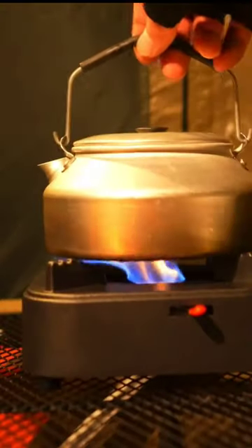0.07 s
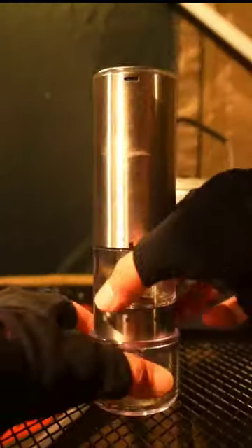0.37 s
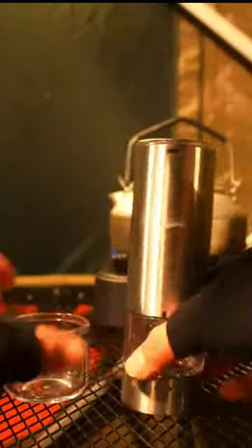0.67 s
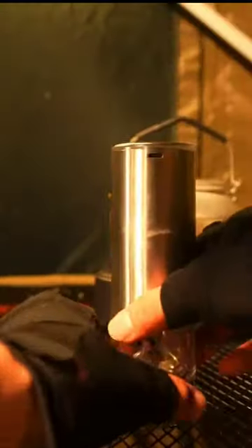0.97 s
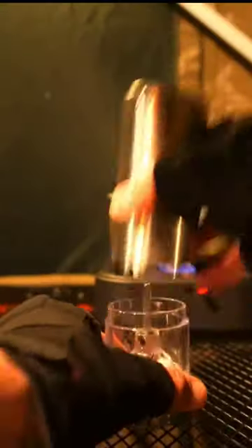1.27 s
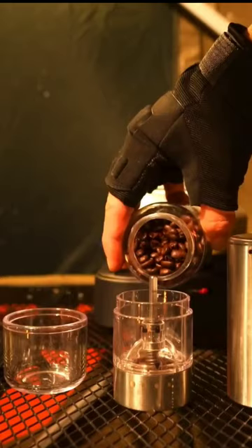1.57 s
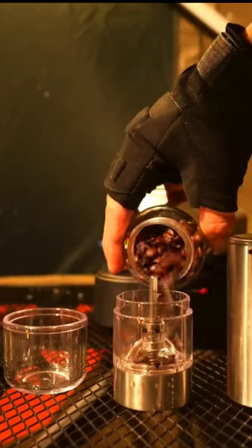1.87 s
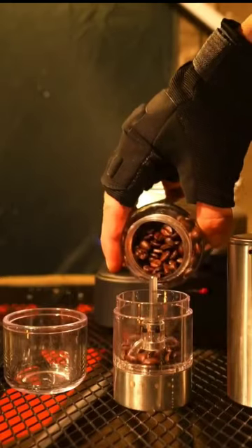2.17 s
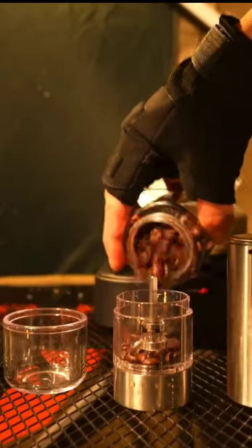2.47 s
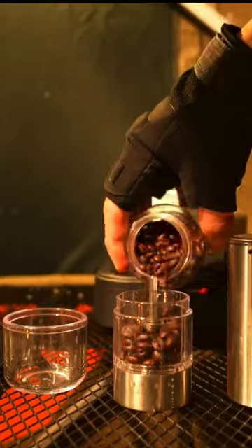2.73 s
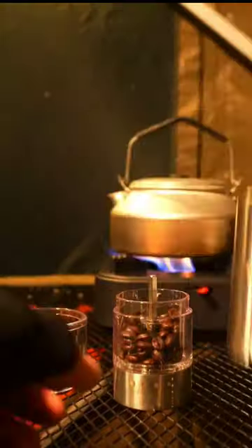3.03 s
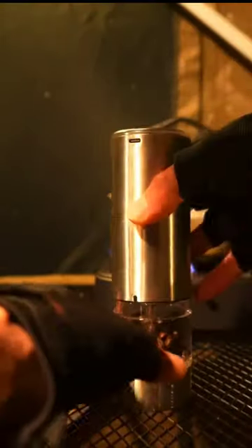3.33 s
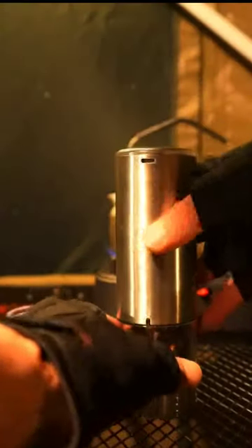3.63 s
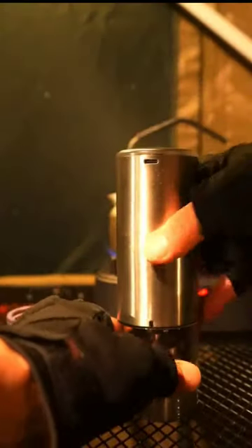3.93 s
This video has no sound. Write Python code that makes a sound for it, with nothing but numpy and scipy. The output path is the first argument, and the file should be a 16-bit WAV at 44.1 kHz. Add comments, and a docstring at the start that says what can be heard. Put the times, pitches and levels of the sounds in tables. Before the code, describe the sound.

Coffee beans clatter into a grinder, close and almost without echo. First, steel and plastic parts knock, scrape and rub apart until about 1.6 seconds. Beans pour from 1.7 to 2.3 seconds and again from 2.6 to 3, clicking brightly and making the plastic chamber ring. The steel top knocks back on at 3.5 and 3.7 seconds. A gas burner softly hisses and rumbles throughout.

```python
"""A steel and plastic coffee grinder is pulled apart and stood on a mesh table, knocking and scraping.
Roasted beans are shaken into it in two pours: they click on each other and make the plastic chamber ring.
Then the steel top is pushed back on. Behind it all, a gas burner hisses and rumbles.
The sound is close, mono and almost free of echo, and it drops out briefly four times."""
import sys
import numpy as np
from scipy import signal
from scipy.fft import rfft, irfft, next_fast_len
from scipy.io import wavfile
from scipy.ndimage import map_coordinates

SR = 44100
rng = np.random.default_rng(int(sys.argv[2]) if len(sys.argv) > 2 else 0)


def materialize(psi):
    """Save the field psi as 16-bit PCM at rate SR to the path in sys.argv[1].

    A 1-D psi becomes a single channel; in a 2-D psi each row is a channel.
    """
    bounded = np.clip(np.atleast_2d(psi).T, -1, 1)
    quanta = np.round(bounded * 32767).astype(np.int16)
    wavfile.write(sys.argv[1], SR, quanta)


N = 176400

# A fade_s is the time a sound takes to die away by 60 dB. A tone lists how strong each pitch is.
# grinder parts knocking together: start_s, thump_db, knock_db, clash_db, hold_s, fade_s
PART_KNOCKS = [(0.032, -20, -14.5, -20.5, 0.0085, 0.067), (0.188, -39, -25.5, -24.5, 0.0063, 0.034),
               (0.237, -25, -24, -34, 0.01, 0.029), (0.2447, -22.5, -16, -19, 0.0014, 0.061),
               (0.7965, -35, -23, -15.5, 0.0074, 0.11), (1.204, -27.5, -19.5, -41, 0.0028, 0.038),
               (3.488, -30, -16, -21.5, 0.0017, 0.069), (3.699, -26.5, -23, -42, 0.0026, 0.03),
               (3.713, -27.5, -23.5, -39, 0.0086, 0.081)]
# parts sliding on each other: peak_s, rise_s, fade_s, rasp_db, body_db
PART_SCRAPES = [(0.034, 0.013, 0.23, -26.5, -28), (.183, .014, 0.066, -25, -19.5),
                (.345, .01, 0.045, -30.5, -31.5), (.38, 0.027, 0.079, -30.5, -33),
                (.76, .003, 0.12, -32, -30.5), (0.844, 0.039, 0.087, -52, -28.5),
                (.906, 0.0053, 0.059, -30, -36), (1.179, 0.0095, 0.037, -29.5, -37),
                (1.3, .004, 0.063, -25, -31), (1.391, 0.0087, 0.094, -24.5, -27.5),
                (1.61, 0.0095, 0.052, -56, -31.5), (3.488, 0.0094, 0.18, -31, -39)]
# low notes of the hollow parts and table: pitch_hz, width_hz, level_db
THUMP_NOTES = [(304, 46, 0), (400, 70, -7)]
# their higher notes: pitch_hz, width_hz, level_db
KNOCK_NOTES = [(714, 60, 1), (1200, 150, 0), (1610, 90, -7), (1970, 65, -8), (2840, 55, -8)]
# their notes when a hand grips them: pitch_hz, width_hz, level_db
GRIPPED_NOTES = [(318, 45, -2), (680, 80, 0), (1110, 170, -8)]
# tone of the dull part of a thump: pitch_hz, level_db
THUMP_TONE = [(120, -50), (200, -17), (280, -6.5), (460, -17.5), (1500, -69)]
# tone of the dull part of a knock: pitch_hz, level_db
KNOCK_TONE = [(330, -20.5), (670, 1.5), (950, 6), (1400, 3.5), (3500, -23.5), (12000, -36)]
# tone of clashing steel: pitch_hz, level_db
CLASH_TONE = [(600, 0), (2000, 0), (3200, 4.5), (8700, 3), (11000, -8), (15500, -18)]
# ringing notes of the steel sleeve: pitch_hz, level_db, fade_s
SLEEVE_NOTES = [(3405, -6, .13), (5868, -2, .1)]
# gloved hands rubbing the parts: time_s, level_db
RUB_LEVELS = [(0, -57), (.6, -44.5), (1.15, -40), (1.4, -38), (1.8, -67), (3.3, -56), (3.55, -40), (4, -59)]
# single beans landing: start_s, level_db, ring_db (the chamber's ring compared with the click)
BEAN_LANDINGS = [(1.706, -16, -18), (1.8164, -18, 2.5), (1.8206, -16, -4), (1.8567, -25.5, 4.5),
                 (1.8911, -15.5, -16), (1.910, -27, -8), (1.923, -18.5, -18), (1.944, -23, -2),
                 (1.977, -18, -10), (2.013, -24, 1.5), (2.046, -22, -5), (2.0533, -20.5, 5),
                 (2.121, -20, -8), (2.152, -18.5, -14), (2.2372, -29, 3), (2.2882, -21, 5), (2.57, -33, 4),
                 (2.6109, -25, -3), (2.6415, -21.5, -3), (2.678, -16.5, 0.5), (2.762, -19.5, 7.5),
                 (2.8154, -25.5, 6.5), (2.978, -35, 2)]
# the stream of beans, one list for each pour: time_s, level_db
POUR_LEVELS = [
    [(1.8, -37), (1.938, -52), (1.948, -21), (2.005, -39), (2.055, -23), (2.085, -24.5), (2.108, -33.5),
     (2.16, -26), (2.23, -31.5), (2.268, -43.5), (2.292, -28), (2.335, -51)],
    [(2.58, -43), (2.69, -27), (2.77, -26.5), (2.855, -29), (2.895, -42), (3.01, -41), (3.05, -55)],
]
# notes of the empty plastic chamber: pitch_hz, width_hz, level_db
CHAMBER_NOTES = [(1620, 120, -2), (4040, 55, 0), (4800, 100, -7), (6100, 220, -10), (6790, 90, 2),
                 (8160, 160, .5), (9500, 300, -5), (10750, 150, -7), (13250, 240, -2), (14600, 290, -8)]
# tone of a bean's own click: pitch_hz, level_db
CLICK_TONE = [(800, -14), (6000, -2.5), (9200, 6.5), (11000, 1.5), (13300, 5.5), (15500, -13)]
# the mesh table's hum as the top is pulled off: start_s, pitch_hz, level_db, fade_s
TABLE_NOTE = (1.35, 143.5, -34.5, 0.2)
# hands bumping the table: start_s, level_db
HAND_BUMPS = [(.338, -25.5), (0.512, -27.5), (1.653, -22.5)]
# tone of the gas jet's hiss: pitch_hz, level_db
HISS_TONE = [(53, -43), (90, -1), (375, -1.5), (486, 0), (971, -2), (2410, -3), (8800, -9), (10800, -16.5),
             (15800, -23)]
# loudness of the hiss: time_s, level_db
HISS_LEVELS = [(1.6, -37), (2.45, -39.5), (3.2, -37)]
# tone of the flame's rumble: pitch_hz, level_db
RUMBLE_TONE = [(12, -15), (35, -11.5), (80, -30), (400, -69)]
# loudness of the rumble: time_s, level_db
RUMBLE_LEVELS = [(.28, -62), (.4, -43), (2, -44), (4, -47.5)]
# brief silences: start_s, recovery_s
DROPOUTS = [(0.3297, 0.014), (.353, 0.021), (1.642, 0.014), (1.667, 0.02)]

TOP_HZ = 15560  # the highest pitch in the sound


def grinder():
    """Knocks, scrapes and rubbing hands all shake the grinder's hollow body."""
    thump = hollow_body(THUMP_NOTES, THUMP_TONE, dull_db=-1)
    knock = hollow_body(KNOCK_NOTES, KNOCK_TONE, dull_db=-9)
    return knocks(thump, knock) + scrapes(knock + amp(-8.5) * thump) + rubbing()


def hollow_body(notes, tone, dull_db):
    """The body's response to one tap: ringing notes over a dull sound that dies quickly."""
    response, dull = ring(notes), tap_with_tone(tone)
    response[:len(dull)] += amp(dull_db) * dull
    return response / np.linalg.norm(response)


def knocks(thump, knock, clash_rise_s=0.0012, usual_clash_db=-20):
    """Parts meet and rattle: the body thumps and knocks, the steel clashes and its sleeve rings."""
    out, t = np.zeros(N), np.arange(SR // 3) / SR
    sleeve = sum(amp(db - 60 * t / fade_s) * np.sin(2 * np.pi * hz * t)
                 for hz, db, fade_s in SLEEVE_NOTES)
    for start_s, thump_db, knock_db, clash_db, hold_s, fade_s in PART_KNOCKS:
        fade = amp(-60 * np.maximum(t - hold_s, 0) / fade_s)
        tilt_db_per_khz = .06 * (clash_db - usual_clash_db)  # a harder clash is brighter
        steel = tap_with_tone([(hz, db + tilt_db_per_khz * hz / 1000) for hz, db in CLASH_TONE])
        low = amp(thump_db) * rattle(fade, thump, per_s=1100, strike=0.33)
        middle = amp(knock_db) * rattle(fade, knock, per_s=2700, strike=0.37)
        clash = rattle(fade * (1 - np.exp(-t / clash_rise_s)), steel, per_s=13000)
        add(out, start_s, low + middle + amp(clash_db) * (clash + amp(-7) * sleeve))
    return out


def scrapes(hollow):
    """Sliding parts catch many times over, so the steel rasps and the hollow body sounds."""
    out, t = np.zeros(N), np.arange(SR // 3) / SR
    steel = tap_with_tone(CLASH_TONE)
    for peak_s, rise_s, fade_s, rasp_db, body_db in PART_SCRAPES:
        past_peak = t - 2 * rise_s
        stroke = amp(np.where(past_peak < 0, 12 * past_peak / rise_s, -60 * past_peak / fade_s))
        rasp = amp(rasp_db) * rattle(stroke, steel, per_s=20000)
        body = amp(body_db) * rattle(stroke, hollow, per_s=4400)
        add(out, peak_s - 2 * rise_s, rasp + body)
    return out


def rubbing():
    """Gloves rub the parts while their grip muffles the ring."""
    friction = tiny_hits(2500, spread_db=2.5)
    return level(RUB_LEVELS) * unit(through(friction, ring(GRIPPED_NOTES)))


def single_beans():
    """Each hard little bean clicks on the burr or on other beans and rings the chamber."""
    out, t = np.zeros(N), np.arange(SR // 10) / SR
    bean = tap_with_tone(CLICK_TONE)
    touch = amp(-60 * t / 0.0076) + amp(-11 - 60 * t / 0.068)  # a sharp start and a softer tail
    for start_s, db, ring_db in BEAN_LANDINGS:
        click = rattle(touch, bean, per_s=15000)
        ringing = rattle(touch, chamber(start_s), per_s=3000, strike=.7)
        add(out, start_s, amp(db) * (click + amp(ring_db) * ringing))
    return out


def pours(hits_per_s=1600, spots=8, wall_db=-2.5, ping_db=-6):
    """Streams of beans strike several spots on the chamber wall and ping against each other."""
    out = np.zeros(N)
    for pour in POUR_LEVELS:
        start_s, end_s, flow = pour[0][0], pour[-1][0], level(pour)
        for _ in range(spots):
            hits = flow * tiny_hits(hits_per_s / spots, spread_db=2.5)
            out += amp(wall_db) * through(hits, chamber((start_s + end_s) / 2)) / np.sqrt(spots)
        out += amp(ping_db) * flow * pings(start_s, end_s)
    return out


def chamber(time_s, detune_share=.006, spread_db=2):
    """The chamber rings a little differently at each spot; the growing heap of beans dulls it."""
    tilt_db_per_khz = -.85 * np.interp(time_s, (2.2, 3), (0, 1))  # the heap grows from 2.2 s to 3 s
    notes = []
    for hz, width_hz, db in CHAMBER_NOTES:
        pitch_hz = hz * (1 + detune_share * rng.normal())
        level_db = db + tilt_db_per_khz * hz / 1000 + spread_db * rng.normal()
        notes.append((pitch_hz, width_hz, level_db))
    return ring(notes, sign=-1)


def pings(start_s, end_s, per_s=4500, low_hz=4600, fade_s=.012, spread_db=8):
    """Beans hit each other at random times, each with a short glassy ring at its own pitch."""
    t, length_s = np.arange(round(fade_s * SR)) / SR, end_s - start_s
    when, pitch, strength = rng.random((int(per_s * length_s), 3)).T[:, :, None]
    hz = low_hz + (TOP_HZ - low_hz) * pitch
    waves = amp(spread_db * strength - 60 * t / fade_s) * np.sin(2 * np.pi * hz * t)
    positions = ((start_s + when * length_s) * SR).astype(int) + np.arange(len(t))
    mixed = np.bincount(positions.ravel(), waves.ravel(), N)[:N]
    return unit(mixed) * np.sqrt(length_s * SR / N)  # average strength 1 during the pour


def table_hum():
    """The mesh table hums one low note that dies away."""
    start_s, hz, db, fade_s = TABLE_NOTE
    t = np.maximum(clock() - start_s, 0)
    return amp(db - 60 * t / fade_s) * np.sin(2 * np.pi * hz * t)


def hand_bumps(pitch_hz=42, fade_s=.13):
    """Hands bump the table, each time making a soft, deep wobble that soon stops."""
    out, t = np.zeros(N), np.arange(SR // 4) / SR
    for start_s, db in HAND_BUMPS:
        add(out, start_s, amp(db - 60 * t / fade_s) * np.sin(2 * np.pi * pitch_hz * t))
    return out


def burner(flutter_db=0.43, flutters_per_s=24.51):
    """The gas jet hisses with a slight flutter; the flame rumbles in soft, uneven puffs."""
    hiss = unit(through(rng.standard_normal(N), tap_with_tone(HISS_TONE)))
    hiss *= amp(np.interp(clock(), *np.transpose(HISS_LEVELS)))
    # a smooth curve through random points
    flutter = map_coordinates(rng.standard_normal(512), [clock() * flutters_per_s], mode="wrap")
    puffs = unit(through(tiny_hits(110, spread_db=5.5), tap_with_tone(RUMBLE_TONE, size=16384)))
    return hiss * amp(flutter_db * flutter) + puffs * level(RUMBLE_LEVELS)


def with_echo(sound, echo_db=-28, rise_s=0.013, fade_s=0.29):
    """The table and a tent wall send back a faint, short echo."""
    t = np.arange(SR // 3) / SR
    tail = rng.standard_normal(len(t)) * amp(-60 * t / fade_s) * (1 - np.exp(-t / rise_s))
    return sound + amp(echo_db) * through(sound, tail / np.linalg.norm(tail))


def rattle(loudness, response, per_s, strike=0):
    """Tiny hits shake an object, following a loudness curve; strike adds one hit at the start."""
    force = loudness * tiny_hits(per_s, spread_db=5.5, samples=len(loudness))
    force[0] += strike * np.linalg.norm(force)
    return unit(through(force, response)) * np.sqrt(np.mean(loudness ** 2))


def tiny_hits(per_s, spread_db, samples=N):
    """Hits of uneven size at random times."""
    hit = rng.random(samples) < per_s / SR
    direction = np.sign(rng.standard_normal(samples))
    strength = amp(spread_db * np.clip(rng.standard_normal(samples), -2, 2))
    return unit(hit * direction * strength)


def ring(notes, size=4096, sign=1):
    """An object's ring after one tap. Wider notes die sooner; sign=-1 flips every second note."""
    t = np.arange(size) / SR
    response = sum(sign ** k * amp(db) * width * np.exp(-np.pi * width * t) * np.cos(2 * np.pi * hz * t)
                   for k, (hz, width, db) in enumerate(notes))
    return response / np.linalg.norm(response)


def tap_with_tone(tone, size=2048):
    """One short tap whose lows and highs follow a tone table."""
    hz, db = np.transpose(tone)
    gain = amp(np.interp(np.log(np.fft.rfftfreq(size, 1 / SR) + 1), np.log(hz), db))
    # keep the tone but pack the energy at the start of the tap (minimum phase)
    cepstrum = irfft(np.log(gain))
    cepstrum[1:size // 2] *= 2
    cepstrum[size // 2 + 1:] = 0
    response = irfft(np.exp(rfft(cepstrum)))
    return response / np.linalg.norm(response)


def through(sound, response):
    """Play a sound through an object, given its response to one tap."""
    return signal.fftconvolve(sound, response)[:len(sound)]


def amp(db):
    """Turn decibels into a number to multiply by."""
    return 10 ** (np.asarray(db) / 20)


def unit(sound):
    """Scale to an average strength (rms) of 1."""
    return sound / np.sqrt(np.mean(sound ** 2) + 1e-20)


def clock():
    """The time of every sample, in seconds."""
    return np.arange(N) / SR


def level(points):
    """A loudness curve through (time_s, level_db) points, silent outside them."""
    return amp(np.interp(clock(), *np.transpose(points), left=-120, right=-120))


def add(out, start_s, sound):
    """Mix a sound into out, beginning at start_s."""
    i = max(0, round(start_s * SR))
    out[i:i + len(sound)] += sound[:N - i]


def scene():
    """Grinder and beans in front, table and burner behind, the same in both channels."""
    mono = with_echo(grinder() + single_beans() + pours()) + table_hum() + hand_bumps() + burner()
    return np.array([mono, mono])


def record(dry):
    """The sound cuts out and fades back in at each dropout; everything above TOP_HZ is removed."""
    gain = np.ones(N)
    for start_s, recovery_s in DROPOUTS:
        progress = (clock() - start_s) / recovery_s
        gain *= np.where(progress < 0, 1, np.sin(np.pi / 2 * np.clip(progress, 0, 1)) ** 2)
    size = next_fast_len(N + SR // 2)
    below_top = np.fft.rfftfreq(size, 1 / SR) < TOP_HZ
    return irfft(rfft(dry * gain, size) * below_top, size)[:, :N]


dry = scene()
out = record(dry)
materialize(out)
```